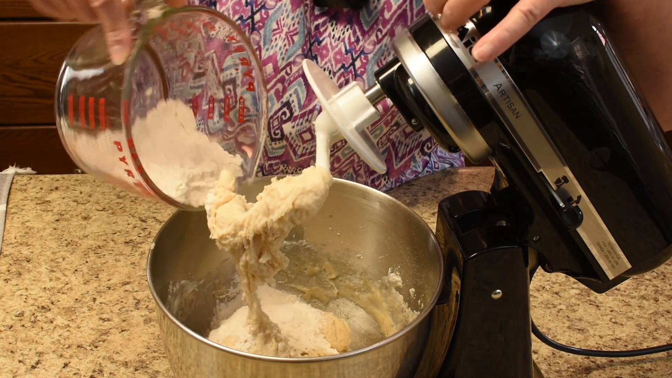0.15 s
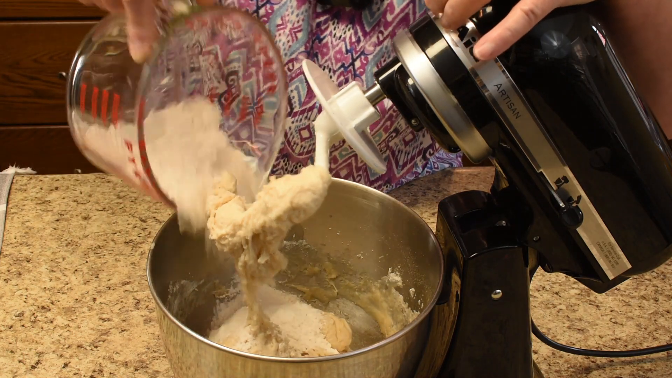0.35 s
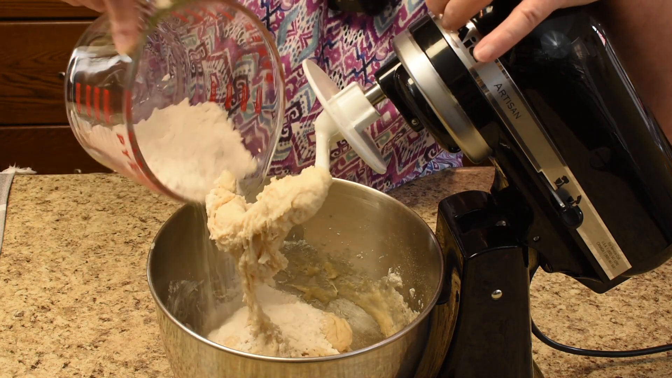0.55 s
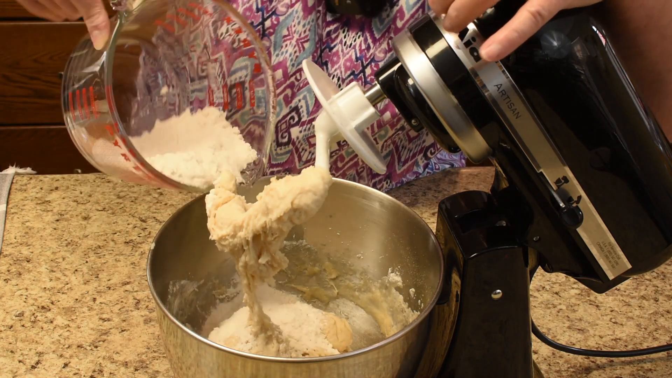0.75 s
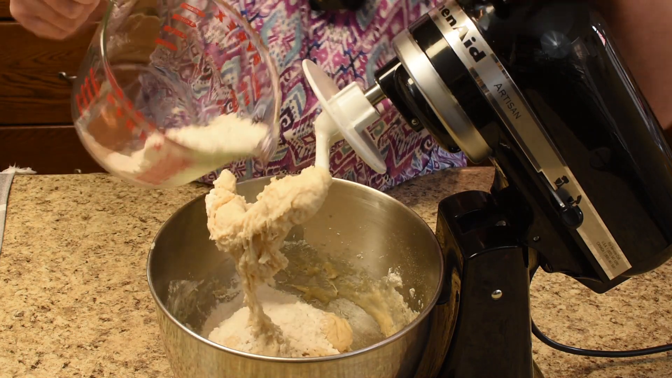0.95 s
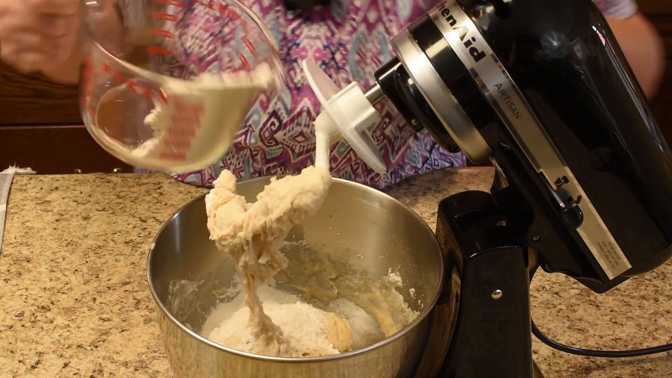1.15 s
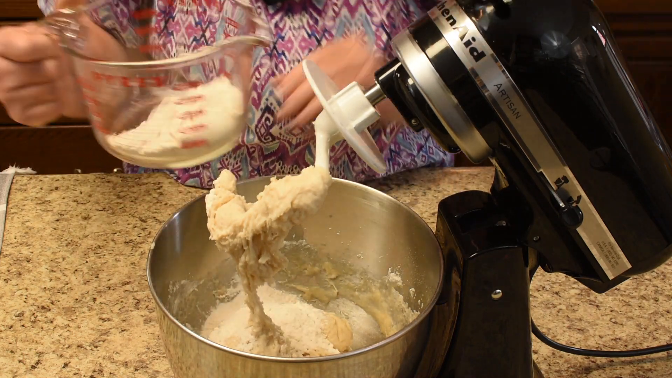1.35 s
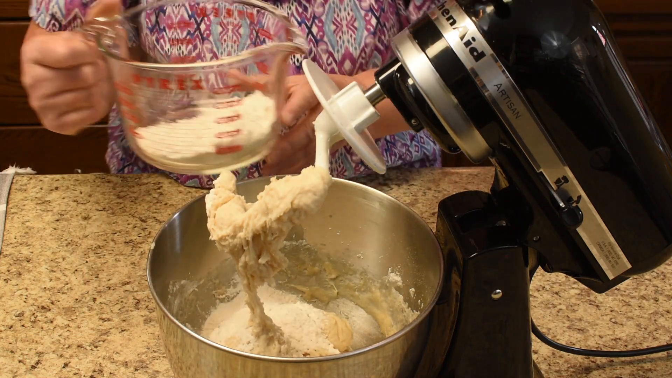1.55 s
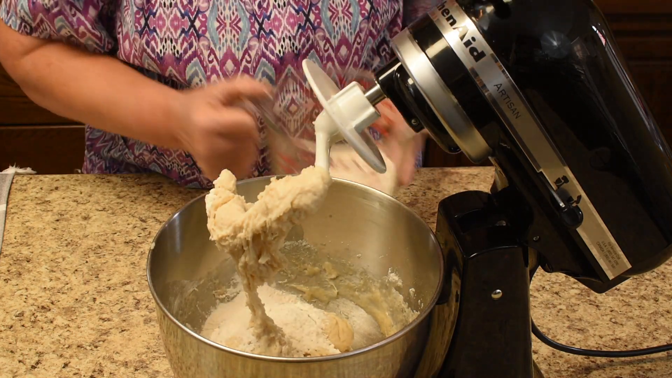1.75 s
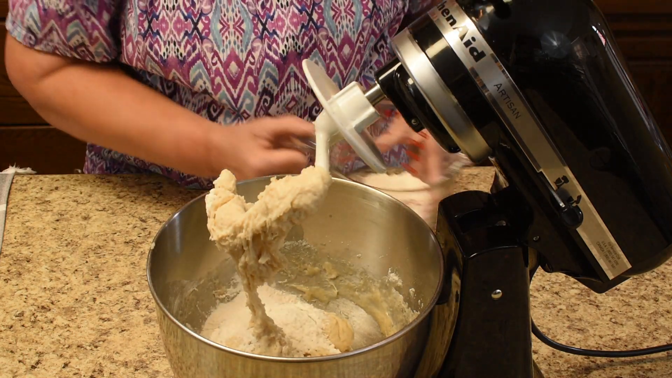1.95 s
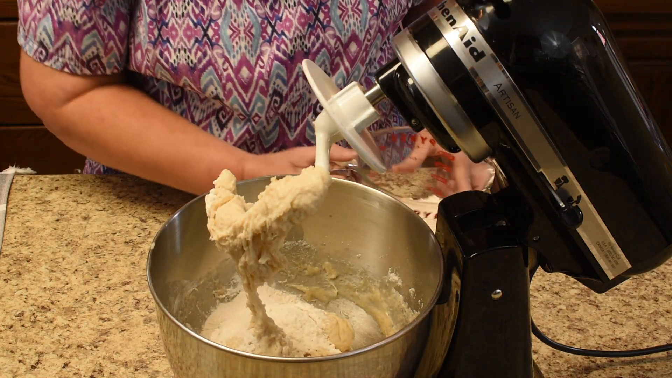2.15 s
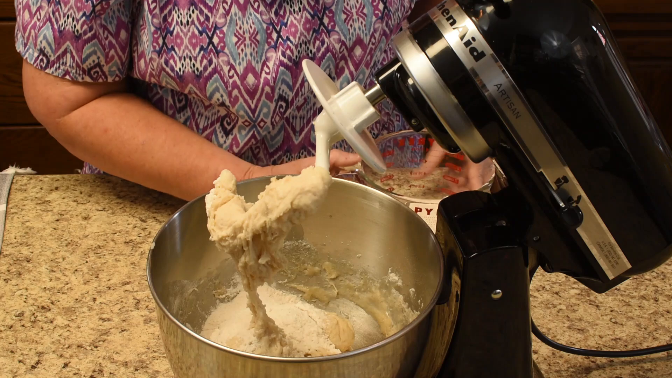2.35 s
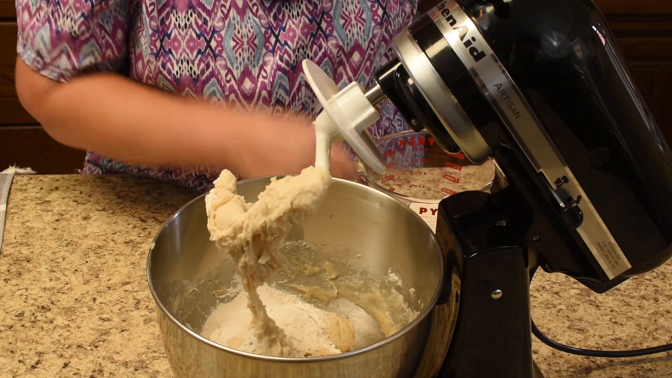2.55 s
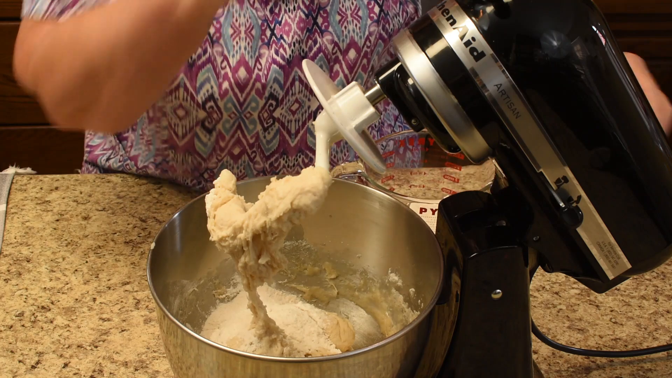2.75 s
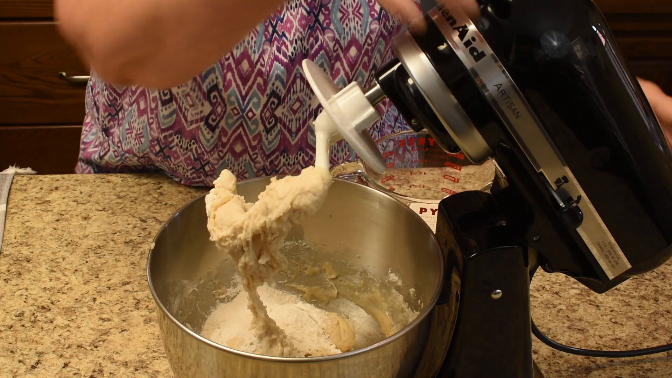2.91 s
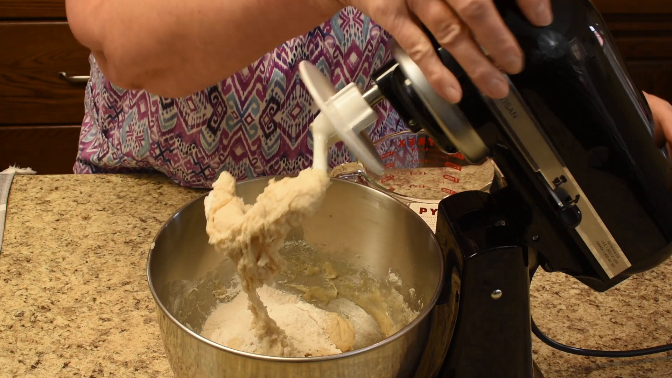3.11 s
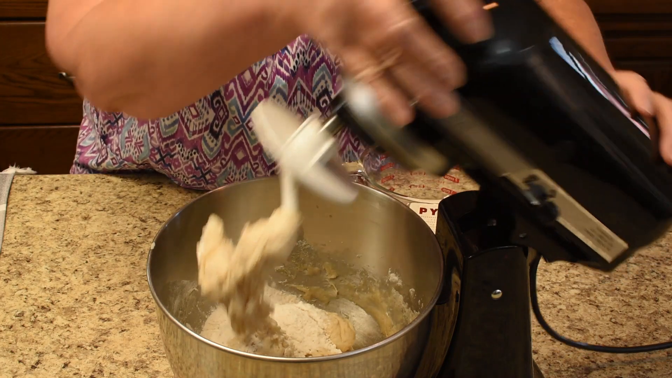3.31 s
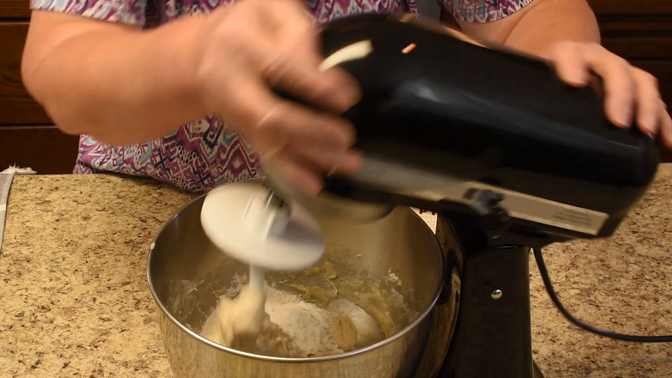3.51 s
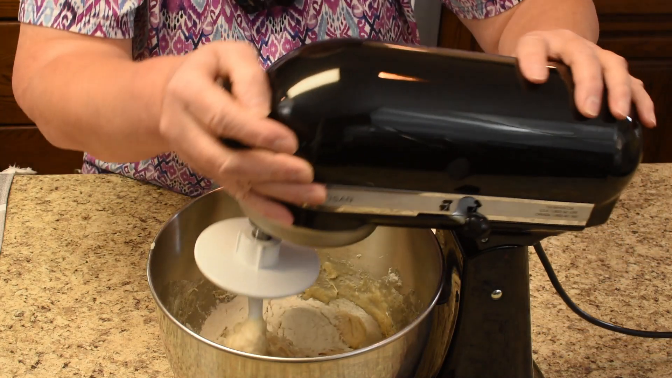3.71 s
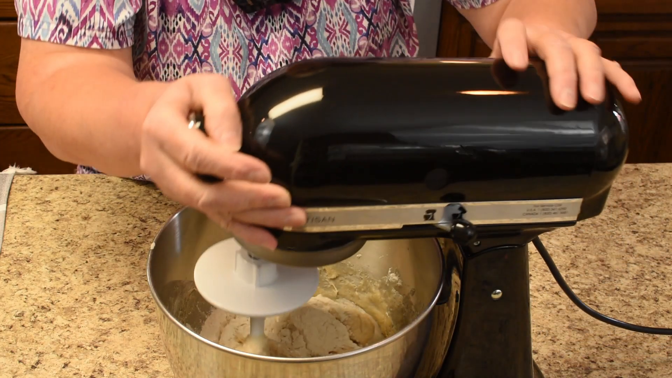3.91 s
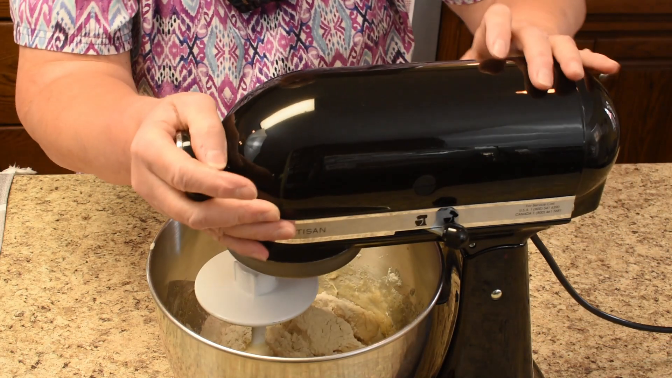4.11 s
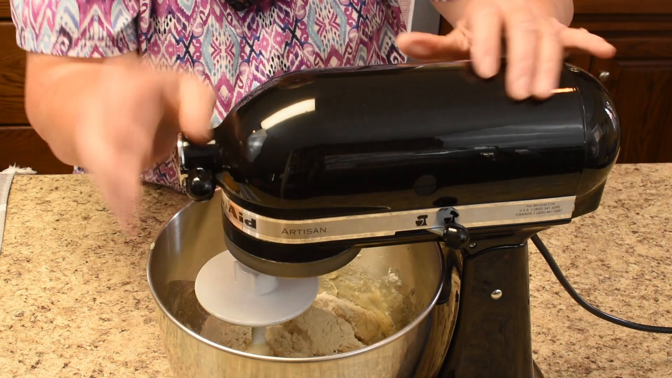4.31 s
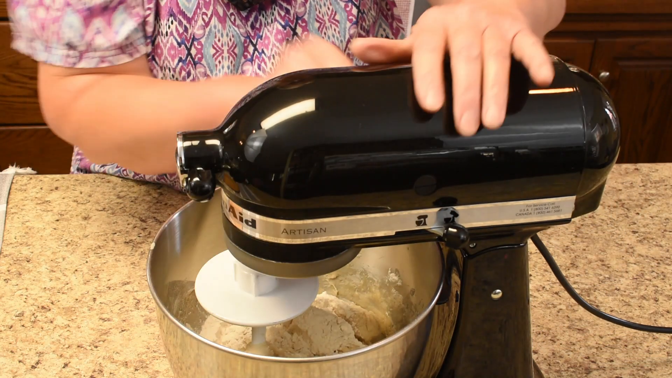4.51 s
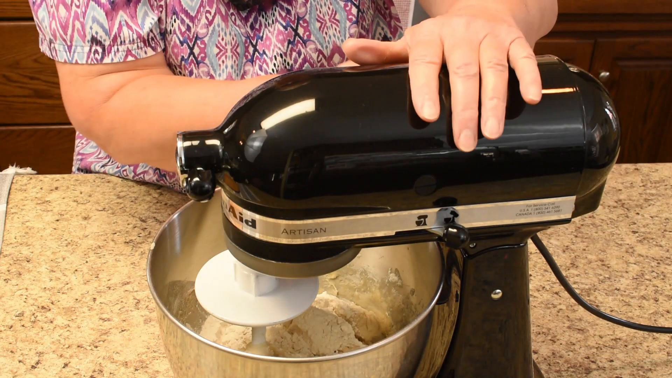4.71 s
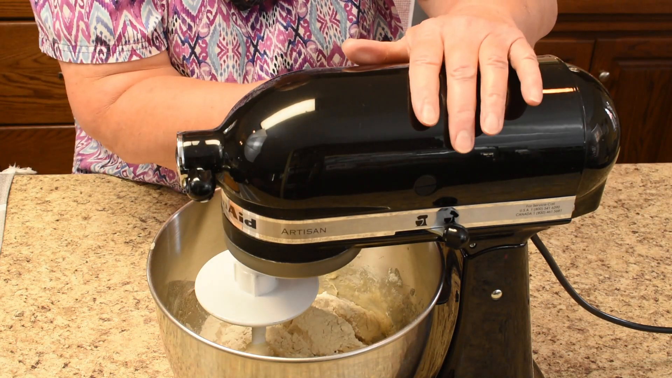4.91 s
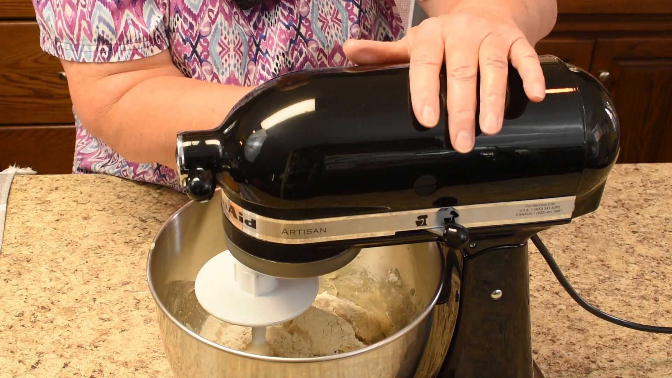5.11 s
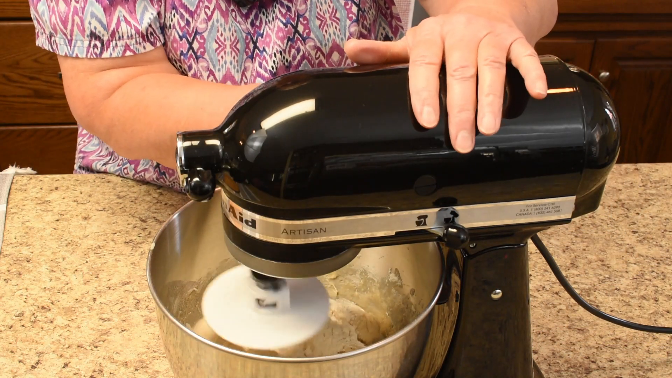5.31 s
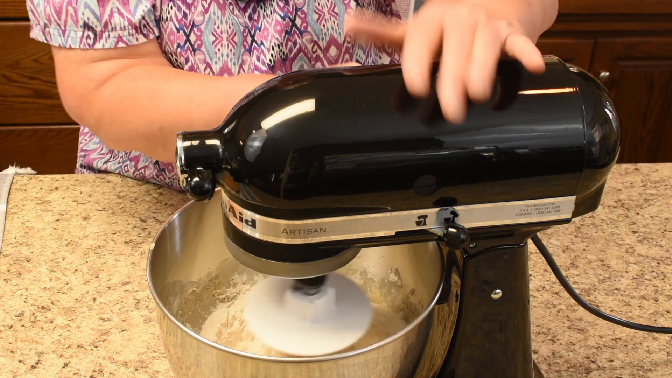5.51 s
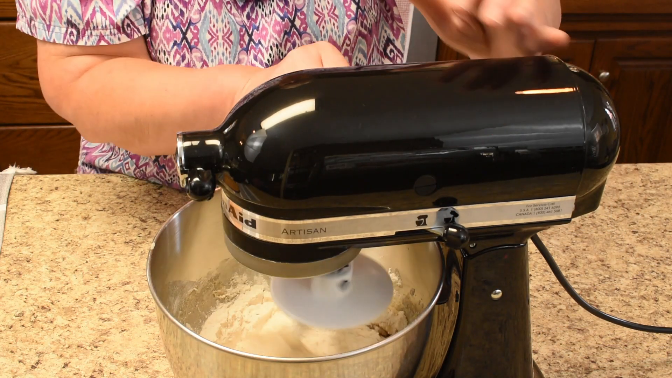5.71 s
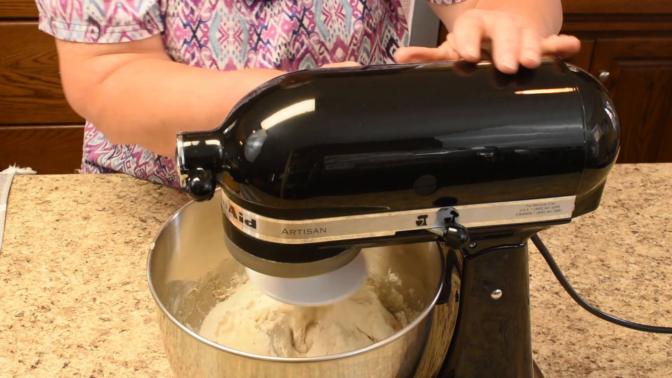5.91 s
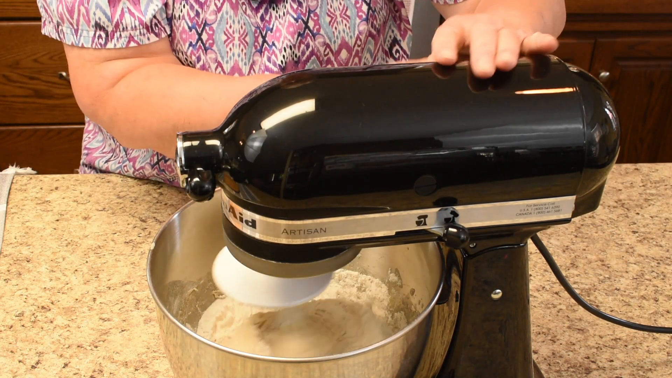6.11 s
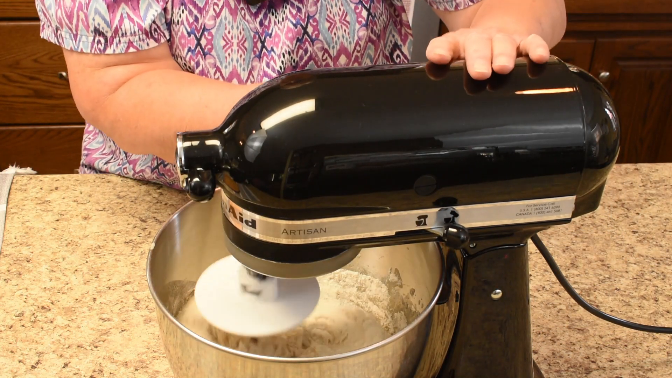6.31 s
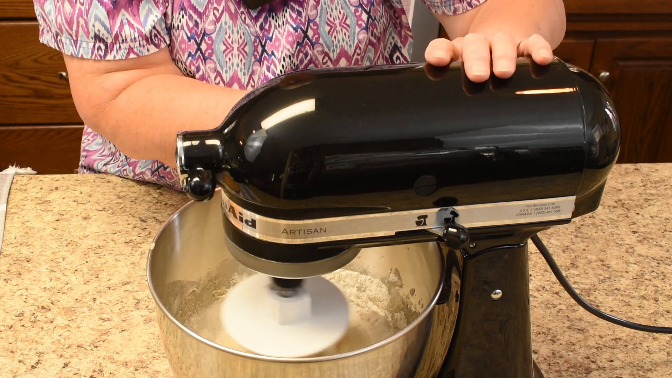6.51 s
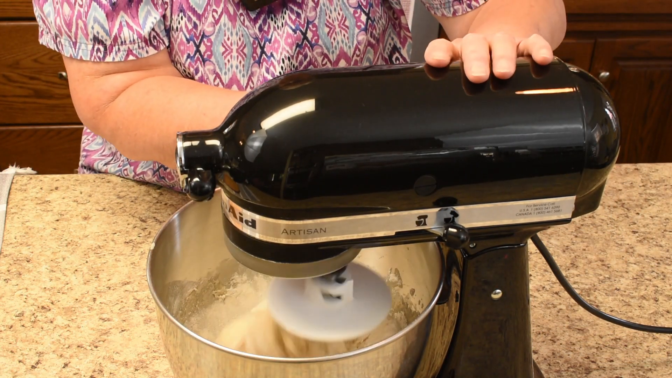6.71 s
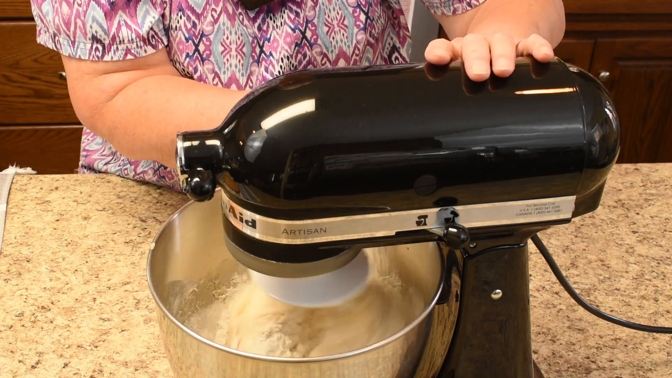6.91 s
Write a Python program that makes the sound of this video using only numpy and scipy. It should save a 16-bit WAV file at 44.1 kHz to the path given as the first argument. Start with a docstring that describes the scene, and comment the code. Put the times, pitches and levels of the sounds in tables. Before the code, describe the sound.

Faint low room air, soft cloth rustle and tiny ticks surround a few glassy taps, then one loud, short counter blow with bouncing aftershocks. After a pause come a small metallic latch click and a duller housing clunk. A stand mixer switches on abruptly, low throbbing roar under bright brush hiss and a sagging whine, briefly dipping before a higher speed. Close and dry with short room echo, almost entirely in the right channel.

```python
"""A stand mixer's motor starts with a surge, works, then steps up in speed: shaped noise and a whine
throb with the shaft over a coil hum. Before it, a glass cup taps the hook and is set down hard on a stone
counter, then the latch clicks and the mixer head drops: short pushes ring fading tones, and noise bursts tick.
A quiet kitchen of shaped noise lies behind. One microphone feeds the right channel; a loose plug lets
a dull copy leak into the left one, most of all for a while after the hardest knock."""
import sys
import numpy as np
from scipy import signal
from scipy.io import wavfile
from scipy.ndimage import uniform_filter1d

SR = 44100
rng = np.random.default_rng(int(sys.argv[2]) if len(sys.argv) > 2 else 0)


def generate_wav(signal):
    """Clip the signal to [-1, 1] and save it as 16-bit WAV at the path in sys.argv[1]."""
    frames = np.transpose(np.atleast_2d(signal))
    scaled = np.clip(frames, -1, 1) * 32767
    pcm = np.round(scaled).astype(np.int16)
    wavfile.write(sys.argv[1], SR, pcm)


N = 306495
T = np.arange(N) / SR  # time of every sample [s]

# All levels are those ahead of the microphone's doubling and soft overload, unless said otherwise.
# Ringing tones of each struck thing: (pitch [Hz], relative level [dB], time to fall 60 dB [s])
COUNTER_TONES = [(186.6, -11.5, 0.22), (346.5, -13.5, 0.26), (408, -7, 0.11), (498, 4.5, 0.0094),
                 (554, -16, 0.13), (640, -10.5, 0.05), (937, -0.5, 0.0185), (1290, 4, 0.012),
                 (1700, -10, 0.018), (2200, -9.5, 0.0057), (2740, -23.5, 0.011), (4410, -39, 0.00645)]
HEAD_TONES = [(85.5, -24, 0.61), (156, -19.5, 0.35), (363, -3, 0.1), (397, 0.5, 0.062), (554, -6.5, 0.041),
              (670, -33.5, 0.98), (866, -3, 0.034), (1470, -2, 0.0058), (2490, -11, 0.04),
              (4070, -29, .008)]
LATCH_TONES = [(345, -12, .1), (727, -14, .04), (1180, 0, .015), (1249, -10, .06), (2552, -22, .02),
               (4800, -16, .008), (3840, -30, .22), (6570, -32, .2)]
CUP_TONES = [(85, -29, 0.071), (179.5, -15.5, 0.22), (285, -15, 0.037), (500, -10.5, 0.032),
             (760, 1.5, 0.024), (1260, -1.5, 0.0073), (1766, -10, 0.019), (3200, -9.5, 0.0078),
             (5960, -14, 0.012)]
# Blows on each thing: (time [s], strength [dB], contact time [ms], room send relative to the blow [dB])
COUNTER_BLOWS = [(2.2016, -4.5, 0.5, -10.5), (2.4111, -18, 0.082, -2), (2.4138, -23, 0.1, -14),
                 (2.4229, -26.5, 0.26, -5.5), (2.4349, -25.5, 0.6, -8.5)]
HEAD_BLOWS = [(4.132, -51, 0.62, 8), (4.1591, -23.5, 0.47, -2), (4.178, -38, 1.5, -2)]
LATCH_BLOWS = [(3.8058, -30, 0.034, -11)]
CUP_BLOWS = [(0.369, -38.5, 0.094, -24), (0.373, -36.5, 0.047, -0.5), (.376, -30, 0.17, -15),
             (0.387, -32.5, 1, 2), (.686, -56.5, 0.24, -4), (0.736, -56, 0.31, -4), (.76, -57, 0.36, -5),
             (.802, -56.5, 0.23, -15), (1.638, -51, 0.57, 4)]
# Small ticks of hands, rings, cup and lever, cracks of the blows, and the plug's click near 1.72 s:
# (time [s], level before the fade [dB], pitch [Hz], width of each of two filters [Hz],
# time to fall 60 dB [s], room send relative to the tick [dB])
SMALL_TICKS = [(0.398, -34, 5400, 5400, 0.022, -9.5), (.652, -59, 3800, 3400, .012, -13),
               (1.058, -42, 3630, 3500, .007, -12), (1.684, -57, 6300, 2500, .008, -19),
               (1.7189, -32.5, 784, 1460, 0.014, -47), (1.721, -44.5, 6240, 5950, 0.012, -40),
               (2.115, -57.5, 2500, 2200, .014, -16), (2.202, -21, 4380, 4020, 0.0085, -13.5),
               (2.4104, -32.5, 6000, 5400, 0.0048, -10), (2.947, -39.5, 800, 700, 0.0072, -12.5),
               (3.014, -53.5, 1394, 1507, 0.013, -15), (3.015, -65, 11940, 5080, .036, 3),
               (3.106, -45.5, 7900, 4990, 0.0092, -9), (3.629, -62.5, 5000, 4520, .05, -4),
               (4.124, -59, 5500, 5000, .014, -8), (4.133, -57, 4000, 3600, .012, -2),
               (4.155, -34, 1420, 1290, 0.029, -10), (4.156, -48, 4360, 4000, 0.023, -1),
               (4.212, -57, 4500, 2000, .01, -11), (4.254, -49.5, 4440, 4060, 0.034, -7),
               (4.809, -67.5, 6500, 5800, .019, 6.5), (4.9629, -52, 2400, 3000, 0.029, -11),
               (4.9893, -54.5, 2210, 2200, 0.034, -8), (5.234, -39, 2160, 1500, 0.027, 9),
               (5.245, -28, 8500, 7600, 0.012, -14)]
# How fast the room's echo dies: (pitch [Hz], time to fall 60 dB [s])
ROOM_FADE = [(100, 0.146), (300, 0.28), (1000, 0.28), (3000, 0.22), (9000, 0.16)]

# Noise colours, whose overall level is set apart: (pitch [Hz], relative level [dB])
AIR_COLOUR = [(18, -65.5), (30, -26), (109, 0), (204, -2.5), (239, -3.5), (295, -2), (328, -6.5), (526, -8),
              (889, -12), (962, -8.5), (1760, -21.5), (7090, -35.5), (16000, -38)]
RUSTLE_COLOUR = [(880, -25.5), (1500, 1), (2740, -4.5), (3380, -3.5), (7100, -7), (15100, -27),
                 (16000, -21.5)]
RATTLE_COLOUR = [(100, -31), (170, -7.5), (350, 1), (900, -1.5), (2000, -11.5), (5000, -28.5),
                 (16000, -50.5)]
ROAR_COLOUR = [(24, -64), (40, -59), (118, -1), (198, -11.5), (381, -1), (519, -1.5), (582, -2.5),
               (778, -4.5), (856, -1.5), (1850, -5.5), (2120, -7.5), (2670, -26), (4000, -65.5),
               (5200, -46), (8800, -120)]
BRUSH_COLOUR = [(1470, -61), (2500, -4), (3570, -4.5), (3830, -2), (4140, -3.5), (4910, 1), (6600, 0),
                (8940, -4.5), (11400, -15.5), (15200, -32), (16000, -45)]
# Resonances of housing and bowl that lift the roar: (pitch [Hz], width [Hz], lift [dB])
HOUSING_PEAKS = [(269, 14, 13), (373, 23, 13.5), (593.6, 19, 14.5), (686, 26, 6.5), (866, 33, 15),
                 (1016, 19, 8.5), (1073.4, 41, 11.5), (1213, 40, 7.5), (1360, 41, 6.5), (1730, 32, 1.5)]
# Peaks that lift the brush hiss: (pitch [Hz], width [Hz], lift [dB])
BRUSH_PEAKS = [(3810, 110, 6), (5040, 80, 6), (5320, 150, 3), (6370, 120, 5), (6865, 60, 4), (7690, 300, 4),
               (9750, 250, 4), (11200, 350, 3), (12400, 600, 3)]
# Hum of the field coils: (multiple of the hum pitch, level [dB])
COIL_HUM = [(1, -57), (2, -61), (5, -51), (6, -56.5), (9, -59)]

# The background level dips briefly: (time [s], level [dB])
BACKGROUND_DIP = [(1.695, 0), (1.714, -14), (1.725, -16), (1.73, -32), (1.736, -18), (1.755, 0)]
# Rustle of sleeves and flour swells with each movement: (middle [s], length [s], lift [dB])
MOVEMENTS = [(1.247, 0.81, 6), (2.156, 0.96, 6.5), (2.93, 0.46, 9.5), (3.65, 0.61, 6.5), (4.4, 0.75, 8)]
# The loose plug is jogged: (time [s], leak level [dB], hold [s], fade [dB per s], shut again at [s])
PLUG_JOGS = [(1.745, -20.5, .01, 37.5, 2), (2.206, -1.5, 1.11, 24, 4.34)]

AIR_DB, RUSTLE_DB = -67, -80
RATTLE_DB, RATTLE_T60_S = -34, 0.59  # level is added to the strength of each blow
CUP_HUM_HZ, CUP_HUM_S, CUP_HUM_DB, CUP_HUM_RISE_S, CUP_HUM_T60_S = 760, 1.745, -61, 0.015, 1.0

# The motor surges at the start; later the lever passes a dead spot and the speed steps up
START_S, SURGE_DB, SURGE_S = 5.226, 5.5, 0.049
STEP_S, DEAD_S, DEAD_DB, SPEED_UP_S = 6.615, 0.028, -9, 0.045
SLOW_HZ, FAST_HZ = 42.2, 53.4  # turns of the shaft per second
ROAR_DB, ROAR_FAST_DB, HISS_DB, HISS_FAST_DB = -43, -42, -44, -42
LOAD_DB, LOAD_WIDTH_HZ = 0.5, 17  # uneven drag of the dough; the width is that of each of two filters
HOOK_DB, HOOK_S, HOOK_ROUND_S = 0.75, 5.69, 0.334  # the hook meets the lump once a round
# The hand leaves the housing and the brightest band of the hiss moves up
HAND_OFF_S, HAND_MOVE_S, COVERED_HZ, OPEN_HZ = 5.57, 0.05, 5290, 6720
# The whine sags in pitch, then fades as the dough stiffens and returns at the higher speed
WHINE_HZ, WHINE_END_HZ, WHINE_SAG_S, WHINE_FAST_HZ = 2215, 2139, 0.28, 2250
WHINE_DB, WHINE_FADE_S, WHINE_FADE_DB_PER_S, WHINE_FAST_DB = -48.5, 5.81, 13.5, -56
THIRD_DB, THIRD_FAST_DB = -57, -50.5  # tone at three times the shaft speed
HUM_HZ = 119.4  # twice the mains
INRUSH_DB, INRUSH_S = 19.5, 0.046  # the coils hum hardest at switch-on, the low multiples most

MIC_LOW_HZ, EDGE_HZ = 45, 15900
LEAK_LOW_HZ, LEAK_HIGH_HZ = 2, 253.2
# The hardest knock jolts the microphone; the left level is relative to the right
JOLT_S, JOLT_DB, JOLT_RISE_S, JOLT_FALL_S, JOLT_LEFT_DB = 2.2075, -9.3, 0.0025, 0.04, -6


def amp(db):
    """Turns decibels into a gain."""
    return 10 ** (np.asarray(db) / 20)


def evened(x):
    """Scales a sound to an rms level of 1."""
    return x / np.sqrt(np.mean(x ** 2) + 1e-30)


def read(points, hz):
    """Reads a table between its points, along a logarithmic pitch axis."""
    f, value = np.transpose(points)
    return np.interp(np.log(hz + 1), np.log(f + 1), value)


def add(mix, s, sound):
    """Mixes a sound in at time s."""
    part = mix[round(s * SR):][:len(sound)]
    part += sound[:len(part)]


def highpass(x, order, hz):
    """Takes away what lies below hz."""
    return signal.sosfilt(signal.butter(order, hz, "high", fs=SR, output="sos"), x)


def resonate(x, hz, width):
    """Keeps a band around a possibly gliding pitch: shift it down to zero, smooth, shift back."""
    turn = np.exp(2j * np.pi * np.cumsum(hz * np.ones(len(x))) / SR)
    r = np.exp(-np.pi * width / SR)
    return 2 * (turn * signal.lfilter([1 - r], [1, -r], x / turn)).real


def noise(spectrum, peaks=(), patchy_db=0.):
    """Noise with a given colour, lifted by peaks and made uneven by drifting patches."""
    hz = np.fft.rfftfreq(2048, 1 / SR)
    a, b, patches = rng.standard_normal((N // 512 + 5, len(hz), 3)).T
    patches = uniform_filter1d(patches, size=12, axis=0)  # neighbouring pitches
    patches = evened(uniform_filter1d(patches, size=8, axis=1))  # neighbouring moments
    db = read(spectrum, hz)
    for f, width, lift in peaks:
        db = db + lift / (1 + (2 * (hz - f) / width) ** 2)
    z = (a + 1j * b) * amp(db[:, None] + patchy_db * patches)
    return evened(signal.istft(z, nperseg=2048, noverlap=1536)[1][:N])


def air():
    """Steady, low air noise with gently drifting patches."""
    return amp(AIR_DB) * noise(AIR_COLOUR, patchy_db=1.3)


def rustle():
    """Sleeves and flour rub: higher noise that swells with each movement."""
    lift_db = sum(db * np.exp(-(2 * (T - s) / length) ** 2) for s, length, db in MOVEMENTS)
    return amp(RUSTLE_DB + lift_db) * noise(RUSTLE_COLOUR, patchy_db=2.0)


def counter_rumble():
    """The counter and all that stands on it rumble on: noise that dies away after each blow."""
    after = sum((T > s) * amp(db - 60 * abs(T - s) / RATTLE_T60_S) for s, db, *_ in COUNTER_BLOWS)
    return amp(RATTLE_DB) * after * noise(RATTLE_COLOUR)


def cup_hum():
    """The cup hums faintly: one tone rises quickly and dies slowly."""
    since = np.maximum(T - CUP_HUM_S, 0)
    rise = 1 - np.exp(-since / CUP_HUM_RISE_S)
    return amp(CUP_HUM_DB - 60 * since / CUP_HUM_T60_S) * rise * np.sin(2 * np.pi * CUP_HUM_HZ * T)


def background_dip():
    """Level of the background dip at every sample, in dB."""
    return np.interp(T, *np.transpose(BACKGROUND_DIP))


def kitchen():
    """Air, rustle, rumble and cup hum, dipping briefly together."""
    return (air() + rustle() + counter_rumble() + cup_hum()) * amp(background_dip())


def room(x):
    """Echoes as sparse taps of random sign, each band dying at its own speed."""
    taps = np.zeros((3, SR // 2))
    at = np.arange(150, SR // 2 - 20, 20)
    at = at + rng.integers(0, 20, (3, len(at)))
    np.put_along_axis(taps, at, rng.choice([-1., 1.], at.shape), axis=1)
    hz, t, z = signal.stft(taps, SR, nperseg=256)
    tails = signal.istft(z * amp(-60 * t / read(ROOM_FADE, hz)[:, None]), SR, nperseg=256)[1]
    tails = tails / np.linalg.norm(tails[0])
    # three tails take turns, in a cycle of seven rounds a second
    turns = np.cos(2 * np.pi * (T * 7 + np.arange(3)[:, None] / 3)) * np.sqrt(2 / 3)
    return signal.fftconvolve(x * turns, tails, axes=1)[:, :N].sum(axis=0)


def ticks():
    """Brief noise bursts around one pitch, dry and as sent to the room."""
    out, t = np.zeros((N, 2)), np.arange(2000) / SR
    grit = highpass(rng.standard_normal((len(SMALL_TICKS), len(t))), 2, 350)
    for (s, db, hz, width, t60, echo_db), g in zip(SMALL_TICKS, grit):
        band = evened(resonate(resonate(g, hz, width), hz, width))
        burst = band * amp(-60 * t / t60) * np.minimum(t / 0.001, 1)
        add(out, s, burst[:, None] * amp([db, db + echo_db]))
    return out


def struck(tones, blows, low_hz):
    """A push rings fading tones; longer contact leaves high ones quiet. Dry and as sent to the room."""
    out, t = np.zeros((N, 2)), np.arange(SR // 2) / SR
    ring = -sum(amp(db - 60 * t / t60) * np.sin(2 * np.pi * hz * t) for hz, db, t60 in tones)
    both = np.array([ring, ring * np.exp(-t / 0.0037)])  # mostly the first crack fills the room
    both = highpass(both, 3, low_hz)  # each thing has its own bass limit
    for s, db, contact_ms, echo_db in blows:
        push = t[:600] * np.exp(-t[:600] / (contact_ms / 4000))  # peaks a quarter into the contact
        hit = signal.oaconvolve(both, push[None] / push.sum(), axes=1).T
        add(out, s, hit * amp([db, db + echo_db]))
    return out


def knocks():
    """Cup on hook, counter, latch and head, each ringing its own tones."""
    hard = struck(COUNTER_TONES, COUNTER_BLOWS, low_hz=168.7) + struck(HEAD_TONES, HEAD_BLOWS, low_hz=66)
    return hard + struck(LATCH_TONES, LATCH_BLOWS, low_hz=241) + struck(CUP_TONES, CUP_BLOWS, low_hz=70.5)


def stepped(slow, fast):
    """A setting that glides from its slow-speed to its fast-speed value at the speed step."""
    return slow + (fast - slow) * (1 - np.exp(-np.maximum(T - STEP_S, 0) / SPEED_UP_S))


def motor_effort(running):
    """Level changes in dB from the surge, the lever's dead spot, the dough's drag and the hook's rounds."""
    surge_db = SURGE_DB * np.exp(-running / SURGE_S)
    dead_db = DEAD_DB * np.exp(-((T - STEP_S + DEAD_S) / DEAD_S) ** 2)
    drag = resonate(resonate(rng.standard_normal(N), 0, LOAD_WIDTH_HZ), 0, LOAD_WIDTH_HZ)
    hook_db = HOOK_DB * np.cos(2 * np.pi * (T - HOOK_S) / HOOK_ROUND_S)
    return surge_db + dead_db + LOAD_DB * evened(drag) + hook_db


def motor_roar(angle, effort_db):
    """Low noise coloured by housing and bowl, throbbing once a turn."""
    roar = noise(ROAR_COLOUR, HOUSING_PEAKS, patchy_db=2.0) * (1 + 0.12 * np.cos(angle))
    return amp(stepped(ROAR_DB, ROAR_FAST_DB) + effort_db) * roar


def brush_hiss(angle, effort_db):
    """Bright noise throbbing with the shaft; its brightest band moves up as the hand leaves."""
    hand_s = [HAND_OFF_S - HAND_MOVE_S, HAND_OFF_S + HAND_MOVE_S]
    centre_hz = np.interp(T, hand_s, [COVERED_HZ, OPEN_HZ])
    hiss = noise(BRUSH_COLOUR, BRUSH_PEAKS, patchy_db=2.5)
    hiss = evened(hiss + 1.1 * resonate(hiss, centre_hz, 700))
    hiss *= 1 + 0.086 * np.cos(angle) + 0.052 * np.cos(2 * angle) + 0.073 * np.cos(3 * angle)
    return amp(stepped(HISS_DB, HISS_FAST_DB) + 0.13 * effort_db) * hiss


def motor_whine(angle, running, fade_db):
    """A narrow band of noise whose pitch sags, then rises a little at the speed step."""
    sagged_hz = WHINE_END_HZ + (WHINE_HZ - WHINE_END_HZ) * np.exp(-running / WHINE_SAG_S)
    whine_hz = stepped(sagged_hz, WHINE_FAST_HZ)
    whine = resonate(resonate(rng.standard_normal(N), whine_hz, 95), whine_hz, 140)
    whine = evened(whine) * (1 + 0.2 * np.cos(angle))
    return amp(stepped(WHINE_DB, WHINE_FAST_DB) + fade_db) * whine


def shaft_tone(angle, fade_db):
    """A pure tone at three times the shaft speed, fading more steeply than the whine."""
    return amp(stepped(THIRD_DB, THIRD_FAST_DB) + 2.36 * fade_db) * np.sin(3 * angle)


def coil_hum(running):
    """The field coils hum at multiples of twice the mains, strong at switch-on and wavering."""
    inrush_db = INRUSH_DB * np.exp(-running / INRUSH_S)
    waver = evened(resonate(rng.standard_normal(N), 0, 10))
    hum = np.zeros(N)
    for k, db in COIL_HUM:
        level_db = db + inrush_db / k + 2.5 * np.roll(waver, 9000 * k)  # each tone wavers apart
        hum += amp(level_db) * np.sin(2 * np.pi * k * HUM_HZ * T)
    return hum


def motor():
    """Roar, hiss, whine and shaft tone follow one turning shaft; the coil hum keeps its own pitch."""
    running = np.maximum(T - START_S, 0)
    angle = 2 * np.pi * np.cumsum(stepped(SLOW_HZ, FAST_HZ)) / SR
    effort_db = motor_effort(running)
    fade_db = stepped(-WHINE_FADE_DB_PER_S * np.maximum(T - WHINE_FADE_S, 0), 0)
    noises = motor_roar(angle, effort_db) + brush_hiss(angle, effort_db)
    tones = motor_whine(angle, running, fade_db) + shaft_tone(angle, fade_db) + coil_hum(running)
    return np.minimum(running / 0.022, 1) * (noises + tones)


def plug_leak():
    """Gain of the leak through the plug: opens at a jog, holds, fades, shuts."""
    gain = np.zeros(N)
    for s, db, hold, fade_db, shut in PLUG_JOGS:
        gain += (T > s) * (T < shut) * amp(db - fade_db * np.maximum(T - s - hold, 0))
    return uniform_filter1d(gain, size=200)


def scene():
    """Everything as it reaches the one microphone."""
    dry, sent = (knocks() + ticks()).T
    mono = dry + room(sent) + kitchen() + motor()
    return np.array([mono, mono])


def record(dry):
    """Bass cut, soft overload, a bias jolt, the dull leak to the left and its hiss, then the treble limit."""
    t = np.maximum(T - JOLT_S, 0)
    # the hardest knock shifts the microphone bias
    jolt = amp(JOLT_DB) * (1 - np.exp(-t / JOLT_RISE_S)) ** 2 * np.exp(-t / JOLT_FALL_S)
    right = np.tanh(2 * signal.lfilter(*signal.butter(2, MIC_LOW_HZ, "high", fs=SR), dry[1]))
    leak = (right + amp(JOLT_LEFT_DB) * jolt) * plug_leak()
    dull = signal.lfilter(*signal.butter(1, [LEAK_LOW_HZ, LEAK_HIGH_HZ], "band", fs=SR), leak)
    hiss = noise([(20, 4.0), (200, -6), (600, -6.5), (14000, -9), (16000, -7.0)])  # (pitch [Hz], level [dB])
    hiss *= amp(-82 + 0.5 * background_dip())  # dips half as deep as the background
    treble_limit = signal.firwin(511, EDGE_HZ, window=("kaiser", 9), fs=SR)
    return signal.oaconvolve(np.array([dull + hiss, right + jolt]), treble_limit[None], "same")


dry = scene()
out = record(dry)
generate_wav(out)
```